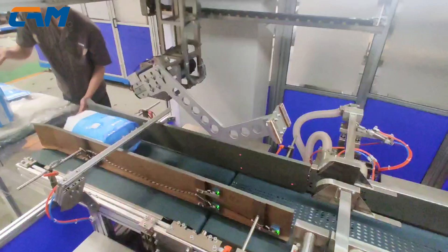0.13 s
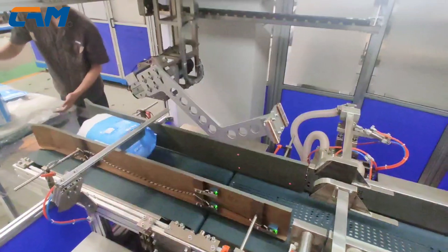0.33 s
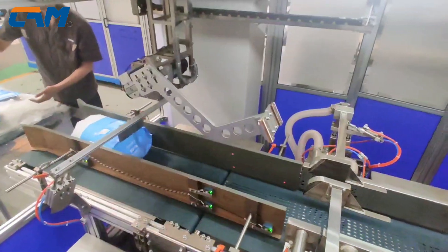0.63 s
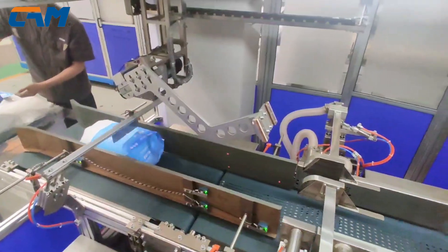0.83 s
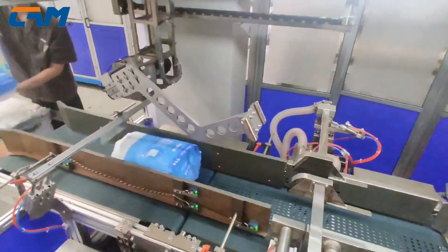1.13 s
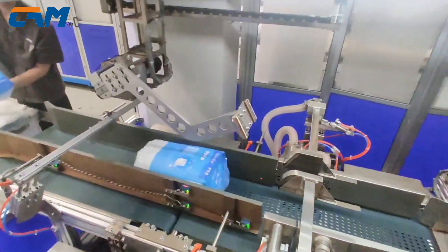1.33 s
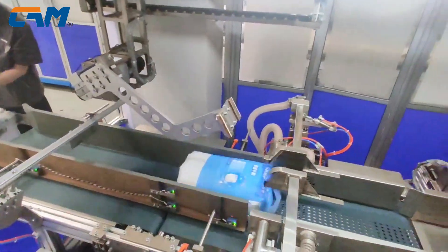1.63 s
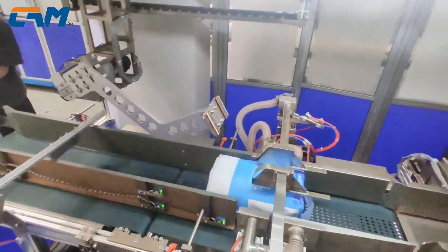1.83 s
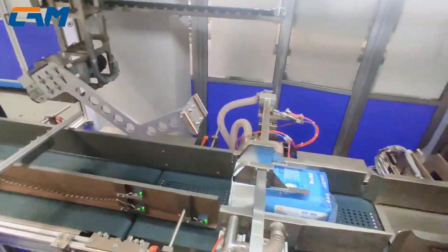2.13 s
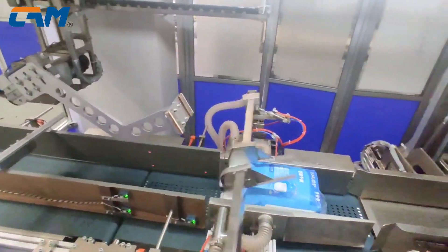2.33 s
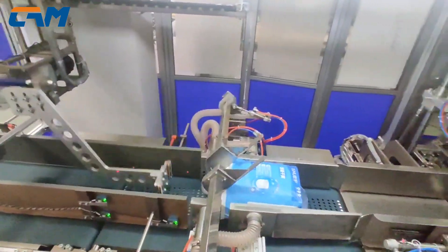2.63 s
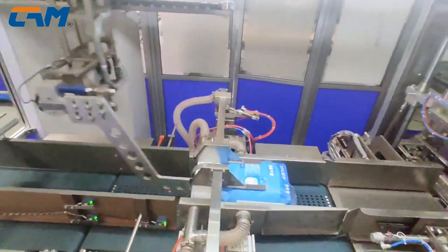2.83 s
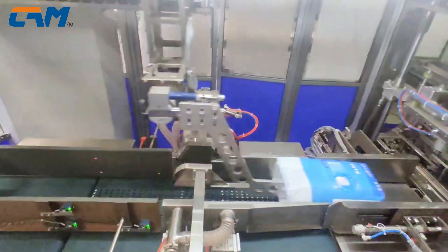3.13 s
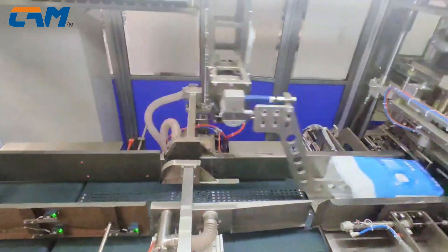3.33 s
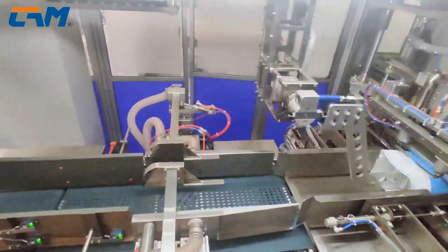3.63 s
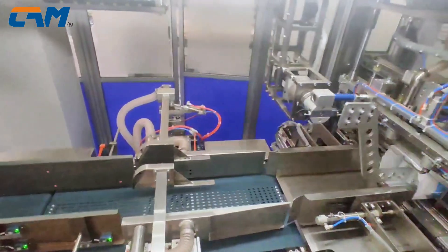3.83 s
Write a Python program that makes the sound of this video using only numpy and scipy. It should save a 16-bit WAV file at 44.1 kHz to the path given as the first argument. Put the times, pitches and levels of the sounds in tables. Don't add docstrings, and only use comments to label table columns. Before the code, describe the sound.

A packing conveyor in a humming factory hall: air puffs, a stop slams, then the belt motor whines upward and rattles steadily amid hissing air, knocks and brief squeals. Close mono camera microphone, dull top end.

```python
import sys
import numpy as np
from scipy import signal
from scipy.fft import rfft, irfft, next_fast_len
from scipy.io import wavfile
from scipy.ndimage import uniform_filter1d, map_coordinates

SR = 44100
rng = np.random.default_rng(int(sys.argv[2]) if len(sys.argv) > 2 else 0)


def to_linear_factor(level_db):
    exponent = np.asarray(level_db, float) / 20
    return 10 ** exponent


def output_pcm(signal):
    pcm = np.clip(np.atleast_2d(signal).T, -1, 1) * 32767
    wavfile.write(sys.argv[1], SR, np.round(pcm).astype(np.int16))


N = 176400

# frequency in Hz, level in dB per Hz.
VALVE_SPECTRUM = [(530, -52), (900, -45), (960, -5.5), (2520, 0), (2750, -1), (3270, -5.5), (5560, -6.5),
                  (7130, -1), (12000, -14), (15600, -45), (22000, -120)]


def unit(x):
    return x / np.sqrt(np.mean(x ** 2) + 1e-20)


def clock():
    return np.arange(N) / SR


def along(points, hz):
    f, v = np.transpose(points)
    return np.interp(np.log(hz + 1), np.log(f + 1), v)


def curves(rows):
    s, *columns = np.transpose(rows)
    return [np.interp(clock(), s, column) for column in columns]


def wobble(rate):
    knots = rng.standard_normal(int(N * rate / SR) + 4)
    return map_coordinates(knots, [clock() * rate])


def filtered(x, response):
    m = next_fast_len(N + SR // 2)
    return irfft(rfft(x, m) * response(np.fft.rfftfreq(m, 1 / SR)), m)[:N]


def resonances(rows):
    def response(f):
        total = 0
        for k, (centre, width, db) in enumerate(rows):
            damping = 1j * f * width
            total = total + (-1) ** k * to_linear_factor(db) * damping / (centre * centre - f * f + damping)
        return total
    return response


def rush(spectrum, patchy_db):
    z = signal.stft(rng.standard_normal(N), nperseg=512)[2]
    patches = uniform_filter1d(rng.standard_normal(z.shape), 5, 0)
    patches = unit(uniform_filter1d(patches, 10, 1))
    x = signal.istft(z * to_linear_factor(patchy_db * patches), nperseg=512)[1][:N]
    return unit(filtered(x, lambda hz: to_linear_factor(along(spectrum, hz))))


def burst(s, attack, t60):
    t = np.clip(clock() - s, 0, None)
    return (1 - np.exp(-t / attack)) * to_linear_factor(-60 * t / t60)


def spell(s, length, edge):
    return np.clip(np.minimum(clock() - s, s + length - clock()) / edge, 0, 1)


def tone(hz, drift_hz, flutter_db):
    flutter = (wobble(24.96) + wobble(90)) * np.sqrt(.5)
    phase = 2 * np.pi * np.cumsum(hz + drift_hz * wobble(30)) / SR
    return np.sqrt(2) * to_linear_factor(flutter_db * flutter) * np.sin(phase)


def hall():
    # frequency in Hz, level in dB per Hz.
    air_spectrum = [(15, -19), (40, -8.5), (110, -14.5), (220, -9), (400, -12), (1100, -24), (1350, -29),
                    (7000, -35), (12000, -41), (14000, -120)]
    # hum in Hz, drift in Hz, level in dB, start in seconds, end in seconds.
    hum_spells = [
        (156, 1.1, -34, .26, .49),
        (154, 1, -37.5, 0, 0.2),
        (274.4, 1, -34.5, 0, 1.08),
        (310.4, 5, -39.5, 0.16, 1.2),
        (486, 4, -42.5, 0.022, 0.55),
        (967, 15, -52.5, 0, 4.8),
        (2256, 8.3, -36.5, 1.3, 2.4),
    ]
    out = to_linear_factor(-34) * rush(air_spectrum, patchy_db=1.5)
    for hz, drift, db, start, end in hum_spells:
        out = out + to_linear_factor(db) * spell(start, end - start, 0.023) * tone(hz, drift, 1.9)
    return out


def valve_puffs():
    # start in seconds, level in dB, attack in seconds, t60 in seconds.
    vents = [
        (0.407, -37, 0.0051, 0.65),
        (0.495, -28, 0.0061, 0.25),
        (1.136, -28.5, 0.0065, 0.34),
        (1.735, -27, 0.0051, .12),
        (2.33, -25.5, .006, .2),
        (2.405, -28, 0.004, 0.1),
        (2.429, -29, .005, .3),
        (3.001, -23, 0.007, 0.36),
        (3.221, -13, 0.0019, 0.055),
    ]
    envelope = sum(to_linear_factor(db) * burst(s, attack, t60) for s, db, attack, t60 in vents)
    return envelope * rush(VALVE_SPECTRUM, patchy_db=1.5)


def mount_bumps():
    # start in seconds, level in dB, t60 in seconds.
    shocks = [
        (.48, -31, 1.8),
        (2.3, -40, 0.51),
        (2.561, -22, 0.25),
        (2.97, -37.5, 0.15),
        (3.2, -35, 0.66),
    ]
    # frequency in Hz, level in dB per Hz.
    thump_spectrum = [(15, -2.5), (45, 12.5), (70, -5), (190, 0.5), (400, -48)]
    envelope = sum(to_linear_factor(db) * burst(s, .01, t60) for s, db, t60 in shocks)
    return envelope * rush(thump_spectrum, patchy_db=1.5)


def knocks():
    # start in seconds, level in dB, pitch in Hz, t60 in seconds.
    blows = [(2.394, -16.5, 787, 0.14), (2.4947, -21, 189, 0.46), (2.5552, -18.5, 443, .35),
             (3.0404, -27, 1050, 0.2), (3.11, -21, 1333, 0.12), (3.8, -21.5, 688, 0.19),
             (2.5, -25, 3600, .1), (3.222, -18, 5170, 0.14), (3.222, -25.5, 8500, 0.11),
             (1.742, -20, 556, 0.12), (3.53, -21, 204.6, 0.33), (0.48, -29.5, 87.3, 1.4),
             (.655, -25, 198.6, 0.54), (.66, -25, 335, 0.63), (.66, -24, 530, 0.32), (.7, -26, 402, 0.32),
             (1.0013, -28, 103.7, 0.92), (1.01, -24.5, 450, 0.57), (1.01, -24.5, 275, .3),
             (1.73, -23.5, 290, .5), (1.9, -22, 285, .3), (.85, -30.5, 1000, 0.44), (3.115, -23, 290, .5),
             (3.215, -19, 480, .2), (3.338, -19, 665, 0.14), (3.34, -20, 1750, .12),
             (3.365, -20.5, 710, 0.25), (3.3, -24.5, 420, 0.23), (3.6, -22, 270, .4), (3.69, -21, 420, .3),
             (3.83, -22, 320, .4), (3.5146, -20, 1720, 0.16), (3.51, -21.5, 606, .4),
             (3.69, -21, 806, 0.19), (3.004, -34.5, 6900, 0.11), (3.215, -21, 6800, .06)]
    out = np.zeros(N + SR)
    t = np.arange(SR // 2) / SR
    hz = np.fft.rfftfreq(len(t), 1 / SR)
    for s, db, pitch, t60 in blows:
        shape = (1 - np.exp(-t / 0.0022)) * to_linear_factor(-60 * t / t60)
        mode = resonances([(pitch, 8 + 1e-5 * pitch ** 2, 0)])
        noise = irfft(rfft(rng.standard_normal(len(t))) * mode(hz), len(t))
        blow = unit(shape * noise) * np.sqrt(np.mean(shape ** 2))
        out[round(s * SR):][:len(t)] += to_linear_factor(db) * blow
    return out[:N]


def stop_clack():
    # frequency in Hz, level in dB per Hz.
    slam_spectrum = [(120, -32), (200, -0.5), (541, -5.5), (1300, -13), (1990, -9), (3960, -22),
                     (6180, -14), (12100, -42.5), (15700, -72), (22000, -120)]
    # frequency in Hz, t60 in seconds.
    ring_down = [(300, 0.59), (2000, 0.2), (8000, 0.3)]
    slam_s = .653
    hz, t, z = signal.stft(rush(slam_spectrum, patchy_db=1), SR, nperseg=256)
    decay = to_linear_factor(-60 * np.clip(t - slam_s, 0, None) / along(ring_down, hz)[:, None])
    tail = signal.istft(z * decay, SR, nperseg=256)[1][:N]
    crack = to_linear_factor(-22) * burst(slam_s, .001, .05) * rush(VALVE_SPECTRUM, patchy_db=3)
    return to_linear_factor(-19) * burst(slam_s, 0.0027, 12) * tail + crack


def belt_rattle():
    # time in seconds, rattle level in dB.
    load = [(.7, -28), (.81, -34), (.93, -26), (1.18, -17), (1.3, -18.5), (1.5, -20), (1.9, -19.5),
            (2.2, -18.5), (2.37, -17.5), (2.5, -21), (2.62, -20.5), (2.8, -23), (3.1, -19.5), (3.28, -20),
            (3.5, -19.5), (4, -19)]
    # frequency in Hz, level in dB per Hz.
    roar_spectrum = [(35, -34), (62, -19), (90, -7.5), (629, -2.5), (945, -6), (1340, -5.5), (2620, -7),
                     (2770, -9.5), (3030, -13.5), (5000, -18.5), (6500, -30.5), (11000, -120)]
    # frequency in Hz, width in Hz, level in dB.
    belt_frame = [(98.1, 24, -3.5), (293.7, 40, -2.5), (406.4, 45.4, 0), (491, 23, 0), (626.7, 23, 2.5),
                  (794, 20.7, 2.5), (1253, 18, -6), (1374, 16, -1), (1660, 150, -9), (1757, 19, -1),
                  (1898, 55, -4), (2258, 35, -9)]
    # frequency in Hz, width in Hz, level in dB.
    pusher_frame = [(103.6, 28, 3), (193.9, 28.3, 5.5), (334.6, 76, 3.5), (405, 120, -4.5),
                    (536.3, 120, 1.5), (652, 10, 6.5), (691, 6.2, 5.5), (826, 130, -2.5), (1269, 23, 1),
                    (1410, 31, -7), (1820, 58, -4), (2040, 70, -2), (2570, 70, -3)]
    links_per_s, scatter_db = 2500, 1
    rings = []
    for frame in (belt_frame, pusher_frame):
        hits = (rng.random(N) < links_per_s / SR) * rng.standard_normal(N)
        hits = hits * to_linear_factor(scatter_db * wobble(40))
        modes = resonances(frame)
        ring = filtered(hits, modes)
        rings.append(unit(filtered(ring, lambda f: np.abs(modes(f)) ** 0.29)))
    share = np.interp(clock(), [2.6, 3.1], [0.11, .8])
    ring = np.sqrt(1 - share) * rings[0] + np.sqrt(share) * rings[1]
    roar = rush(roar_spectrum, patchy_db=2.5)
    db, = curves(load)
    runs = np.clip((clock() - load[0][0]) / 0.1, 0, 1)
    return runs * to_linear_factor(db + 0.33 * wobble(9)) * (to_linear_factor(-2.5) * ring + to_linear_factor(-4.5) * roar)


def gear_whine():
    # time in seconds, mesh frequency in Hz, level in dB.
    run_up = [(.78, 1180, -52), (.88, 1540, -41), (.945, 1750, -27), (1.06, 2170, -28.5), (1.13, 2490, -30),
              (1.2, 2700, -31), (1.27, 2815, -27.5), (1.5, 2826, -31), (1.72, 2826, -30), (1.8, 2826, -27),
              (2.0, 2827, -28.5), (2.45, 2826, -27.5), (2.62, 2819, -29), (2.69, 2817, -25),
              (2.8, 2817, -28), (3.08, 2819, -26), (3.14, 2826, -29), (3.36, 2826, -21.5),
              (3.51, 2826, -26.5), (3.58, 2826, -21.5), (3.7, 2826, -30), (3.76, 2826, -26), (4, 2826, -28)]
    # time in seconds, half length in seconds, dip in dB.
    unloads = [
        (.966, .008, -12),
        (1.0, .006, -8),
        (1.078, .016, -8),
        (1.165, .008, -8),
        (1.2, .008, -8),
        (1.38, .011, -13),
        (1.45, .018, -20),
        (1.6, .018, -12),
        (1.925, .016, -24),
    ]
    hz, db = curves(run_up)
    rising = clock() < 1.25
    for s, half, dip_db in unloads:
        db = db + dip_db * np.exp(-((clock() - s) / half) ** 2)
    db = db + 2.5 * wobble(80) * rising
    hz = hz + 22 * wobble(90) * rising
    return (clock() > run_up[0][0]) * to_linear_factor(db) * tone(hz, 2.5, 1.3)


def compressed_air():
    # time in seconds, flow level in dB.
    flow = [(.8, -49), (1.17, -31.5), (1.53, -32), (2.3, -31), (2.5, -28.5), (2.6, -25.5), (3.03, -26.5),
            (3.15, -29.5), (3.35, -32), (3.65, -28.5), (4, -28)]
    # frequency in Hz, level in dB per Hz.
    jet_spectrum = [(1710, -29.5), (2900, -12), (2970, -4), (3330, -7.5), (4930, -9), (5270, -8.5),
                    (5660, -4), (8090, -6), (12100, -20), (15700, -61), (22000, -120)]
    db, = curves(flow)
    runs = np.clip((clock() - flow[0][0]) / 0.036, 0, 1)
    return runs * to_linear_factor(db + .7 * wobble(12)) * rush(jet_spectrum, patchy_db=1.5)


def latch_tick():
    tick_spectrum = [(2000, -20), (3000, 0), (4200, 0), (9000, -6), (12000, -16)]  # (Hz, dB per Hz)
    return to_linear_factor(-21) * burst(2.416, .003, .13) * rush(tick_spectrum, patchy_db=2)


def bearing_squeal():
    # start in seconds, length in seconds, level in dB.
    squeals = [
        (2.555, .06, -34),
        (2.595, .045, -28.5),
        (2.645, .05, -37),
        (2.75, .075, -36),
        (2.905, .062, -26.5),
        (2.955, .068, -25.5),
    ]
    gate = sum(to_linear_factor(db) * spell(s, length, .018) for s, length, db in squeals)
    return gate * tone(5371, 4, 1)


def pusher_whine():
    # time in seconds, frequency in Hz, level in dB.
    arm_gear = [(2.825, 2720, -64), (2.85, 2724, -32.5), (2.97, 2736, -36.5), (3.07, 2735, -32.5),
                (3.5, 2735, -33), (3.78, 2729, -39), (3.82, 2729, -26), (4, 2733, -31.5)]
    hz, db = curves(arm_gear)
    return to_linear_factor(db) * tone(hz, 2.5, 1.6)


def coarse_grain(x, size=1024):
    # frequency in Hz, usual level over the rounding step as a ratio.
    level_over_step = [(300, 4), (1500, 1.5), (3300, .58), (4600, .47), (6500, .9), (8300, .72),
                       (9200, .34), (12000, .285)]
    n, k = np.arange(2 * size) + .5, np.arange(size) + .5
    window = np.sin(np.pi * n / (2 * size))[:, None]
    basis = window * np.cos(np.pi / size * np.outer(n + size / 2, k)) * np.sqrt(2 / size)
    blocks = np.pad(x, (size + 400, 2 * size - 400 - N % size)).reshape(-1, size)
    c = np.hstack([blocks[:-1], blocks[1:]]) @ basis
    loud = np.mean(c ** 2, axis=1, keepdims=True) + 1e-20
    shape = np.median((c ** 2 / loud).reshape(len(c), -1, 32), axis=(0, 2)).repeat(32)
    usual = loud * shape * 2.2
    now = 2.2 * np.median(c.reshape(len(c), -1, 16) ** 2, axis=2).repeat(16, axis=1)
    draw = rng.standard_normal((len(c), size // 32)) + .9 * rng.standard_normal((len(c), 1))
    swing = to_linear_factor(2.2 * unit(uniform_filter1d(draw, size=2, axis=0))).repeat(32, axis=1)
    finer = np.where(loud < to_linear_factor(2 * -26), 1.35, 1)
    fineness = along(level_over_step, k * SR / (2 * size)) * finer
    step = now ** .3 * usual ** .2 * swing / fineness + 1e-12
    out = (np.sign(c) * np.floor(np.abs(c) / step + .4) * step) @ basis.T
    return (out[1:, :size] + out[:-1, size:]).ravel()[400:][:N]


def scene():
    mono = hall() + valve_puffs() + mount_bumps() + knocks() + stop_clack() + belt_rattle()
    mono = mono + gear_whine() + compressed_air() + latch_tick() + bearing_squeal() + pusher_whine()
    return np.array([mono, mono])


def roll_off(x):
    return signal.sosfilt(signal.butter(12, 12000, fs=SR, output="sos"), x)


def record(dry):
    t = clock() - .12
    fade = np.clip(t / 0.0038, 0, 1) * np.clip(0.11 + t / 0.42, 0, 1)
    heard = coarse_grain(dry[0] * fade)
    heard = filtered(heard, lambda hz: hz < 12090) * (t > 0)
    return roll_off(np.tile(heard, (2, 1)))


dry = scene()
out = record(dry)
output_pcm(out)
```